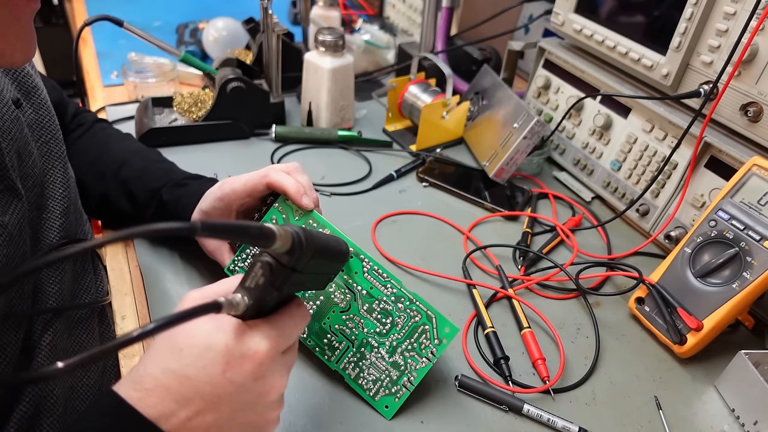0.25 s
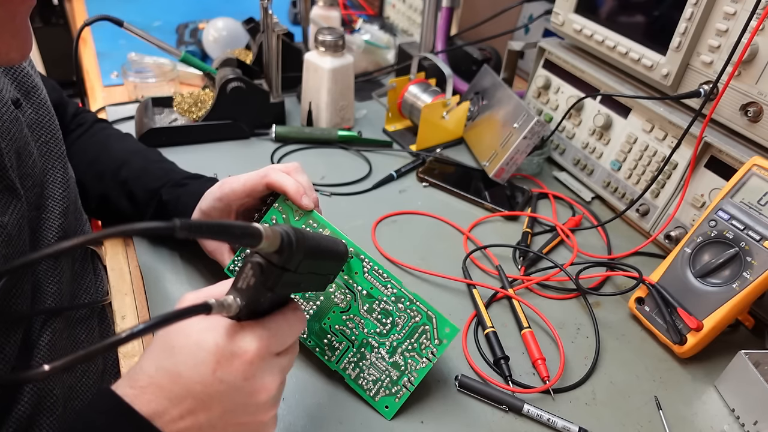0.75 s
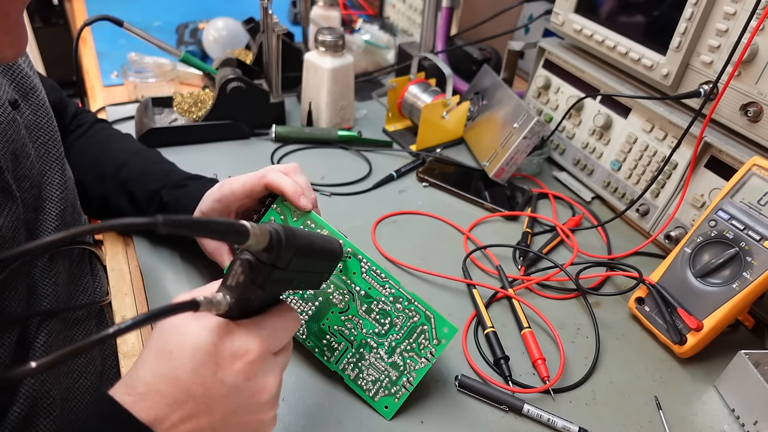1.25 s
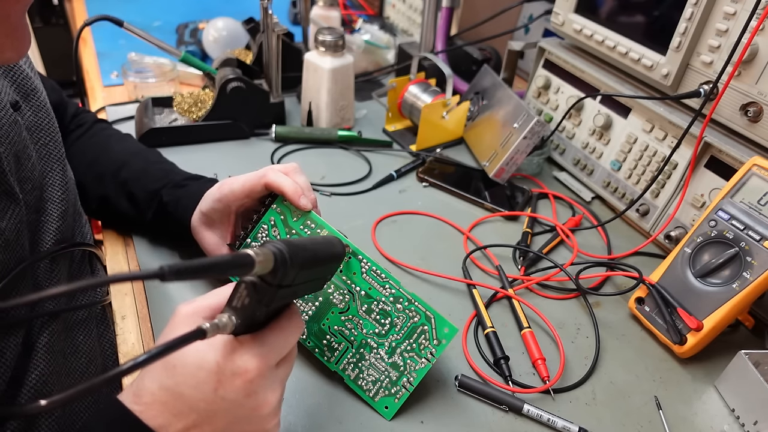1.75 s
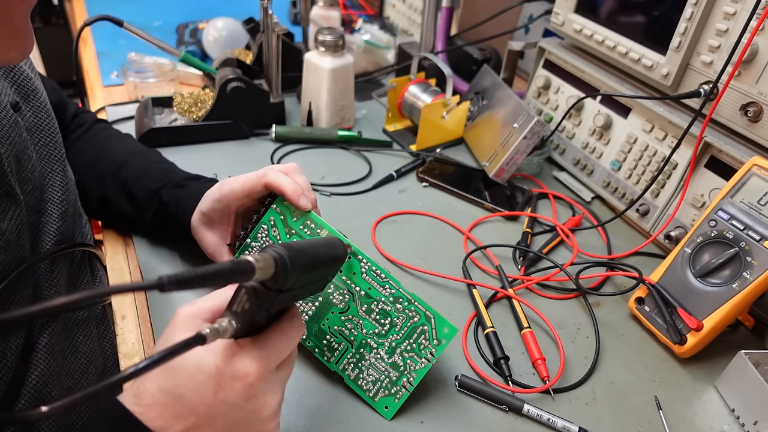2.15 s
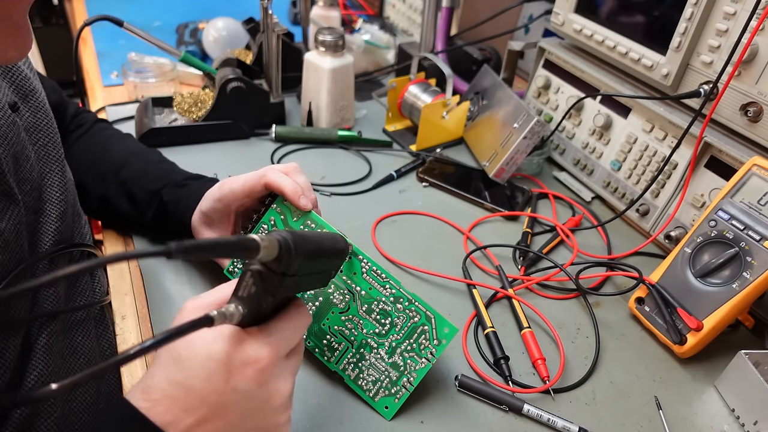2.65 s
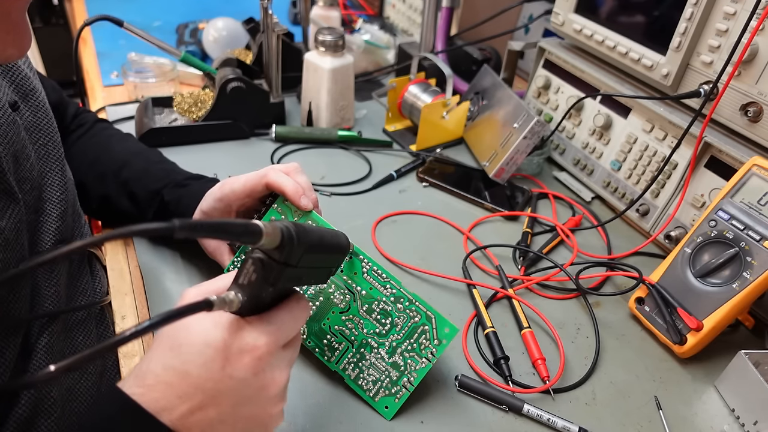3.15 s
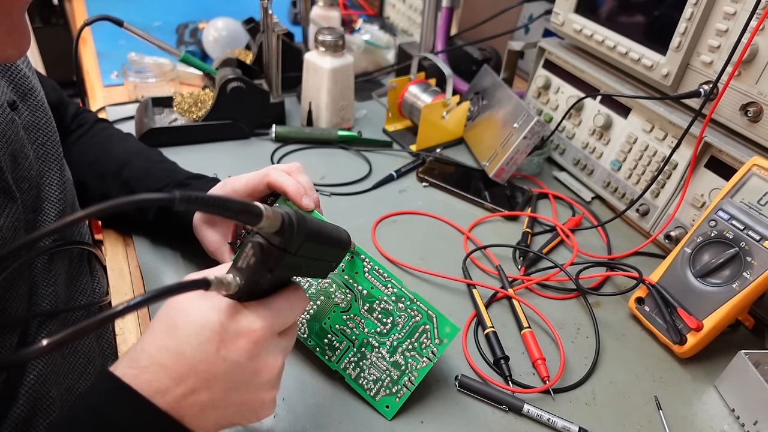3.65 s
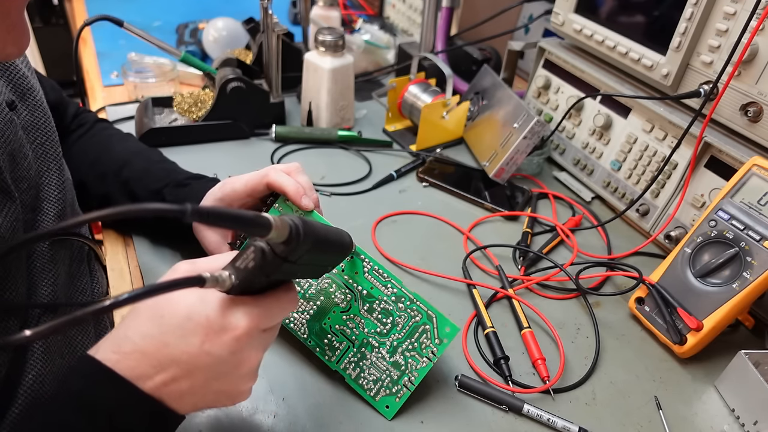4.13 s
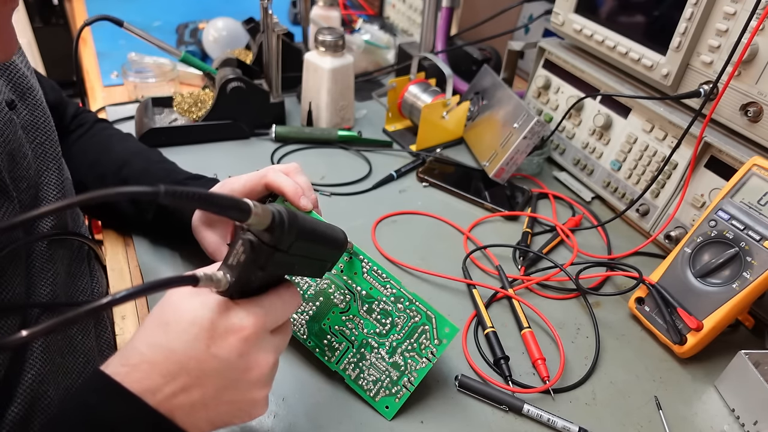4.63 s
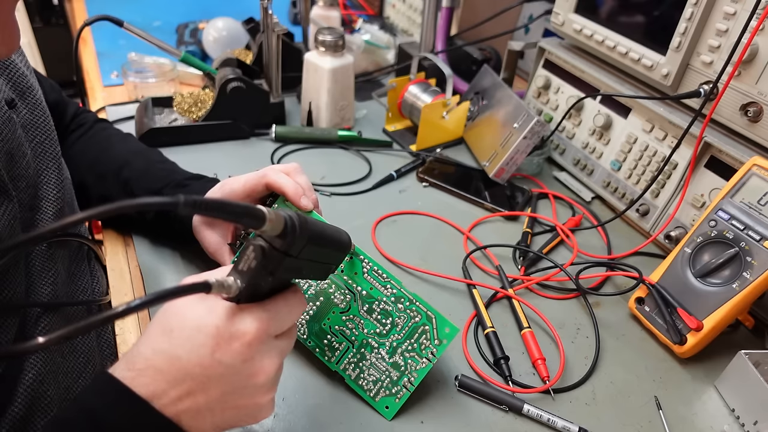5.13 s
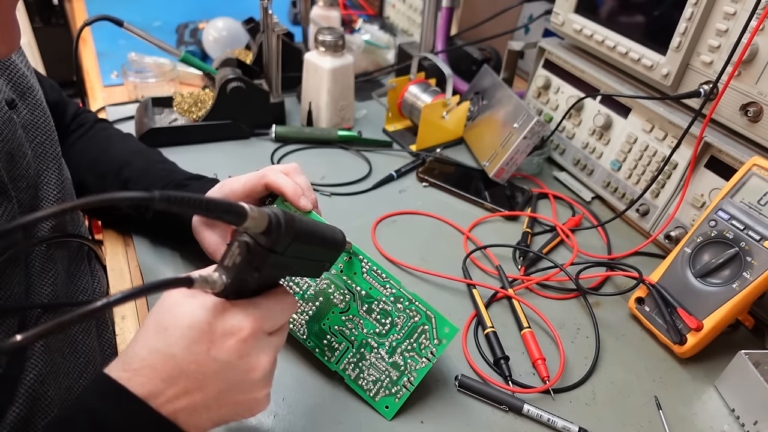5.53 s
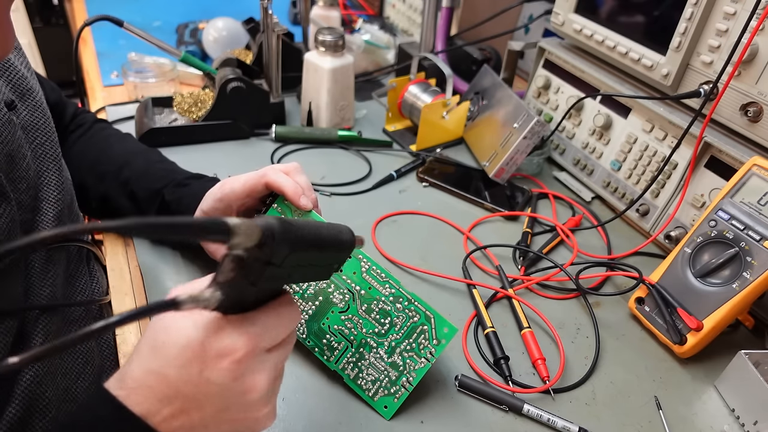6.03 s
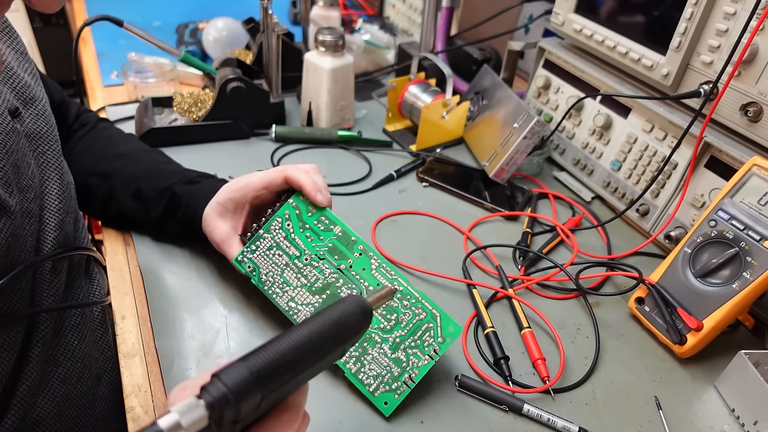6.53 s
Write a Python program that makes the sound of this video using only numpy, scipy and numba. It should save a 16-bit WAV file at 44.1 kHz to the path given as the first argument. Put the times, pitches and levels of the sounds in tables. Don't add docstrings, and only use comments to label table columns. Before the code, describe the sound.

A desoldering gun gives two harsh, pop-edged air blasts, separated by quiet fan noise, small board clicks, knocks and cable rustle.

```python
import sys
import numpy as np
from scipy import signal
from scipy.fft import rfft, irfft
from scipy.io import wavfile
from scipy.ndimage import uniform_filter1d
from numba import njit

SR = 44100
rng = np.random.default_rng(int(sys.argv[2]) if len(sys.argv) > 2 else 0)


def transcribe(u):
    v = np.clip(np.atleast_2d(u).T, -1, 1)
    q = np.round(v * 32767).astype(np.int16)
    wavfile.write(sys.argv[1], SR, q)


def boost_factor(decibels):
    exponent = np.asarray(decibels, float) / 20
    return 10 ** exponent


N = 299439
T = np.arange(N) / SR

# f/Hz, level per Hz/dB
FAN_AIR = [(12, -40.5), (20, 2), (169, 0.5), (195, -5.5), (230, -2), (332, -3), (361, -1.5), (709, -6.5),
           (1390, -7.5), (1560, -10.5), (1790, -11), (2970, -16), (4050, -19.5), (15200, -25),
           (16500, -41.5)]
# f/Hz, width/Hz, level/dB
FAN_HUMPS = [(315, 45, 5), (835, 110, 5), (1573, 82, 9), (3500, 700, 4), (7260, 960, 4.5)]
# f/Hz, level/dB
FAN_TONES = [(199.2, -63), (301.5, -75), (333.8, -63), (699.8, -64), (845.2, -75.5), (1588, -71),
             (2094, -70.5), (2293, -75), (2595, -77), (2891, -66), (3004, -75.5), (3289, -93.5),
             (7246, -89)]
# f/Hz, time to fall by 60 dB/s
ROOM_ECHO = [(100, 0.32), (1000, 0.28), (4000, 0.35), (8000, 0.36), (16000, 0.26)]

# t/s, level/dB
RUSTLE = [
    [(0.0, -42.5), (0.282, -57.5), (0.8, -49.5)],
    [(1.7, -49.5), (1.904, -66), (2.55, -60)],
    [(4.75, -62), (5.034, -50), (5.188, -53), (5.36, -69)],
    [(6.35, -53), (6.49, -47), (6.706, -40.5), (6.79, -27)],
]
# t/s, level/dB, f/Hz, length/s
SCUFFS = [(0.411, -54.5, 7000, .015), (0.526, -28, 2220, .0039), (0.55, -39, 1800, .021),
          (0.65, -52, 7000, 0.014), (4.3, -58, 2500, .023), (4.84, -36, 2500, 0.0043),
          (6.748, -41, 350, .007), (0, -37.5, 298, 0.018), (.015, -43, 2500, .014),
          (4.866, -41.5, 5000, .021), (2.265, -44, 2200, 0.011), (4.984, -46, 870, 0.031),
          (5.065, -56, 8000, .015), (5.126, -51, 7960, .011), (5.152, -45, 2500, .012),
          (6.785, -43, 8000, .013)]
# t/s, level/dB, f/Hz, length/s
SQUEAKS = [
    (.41, -46, 2190, .012),
    (1.895, -39.5, 2000, 0.015),
    (2.77, -58.5, 3300, 0.029),
    (3.63, -60, 3600, 0.039),
    (4.09, -58, 2200, .035),
    (4.63, -59, 3500, .03),
    (4.852, -39.5, 12000, .012),
    (2.4, -44, 2100, .006),
    (6.768, -40, 2100, .017),
]

# f/Hz, level/dB, ring time/s (unused: each touch sets its own ring time)
BOARD_MODES = [(433, -4.5, 0.22), (757, 8, 0.18), (1190, 7, 0.058), (1494, 4, 0.078), (1715, 11.5, 0.075),
               (1955, -31, 0.048), (2050, 25, 0.058), (2490, -0.5, 0.088), (2686, -19.5, 0.051),
               (3195, -19.5, 0.042), (3340, 17, 0.12), (5250, -23.5, 0.087)]
# t/s, peak level/dB, f/Hz
TICKS = [(0.387, -19.5, 2100), (0.5248, -15.5, 2270), (0.5432, -16.5, 2140), (0.5737, -30, 2950),
         (0.6167, -18.5, 2240), (1.7714, -27.5, 1920), (1.9095, -29, 1770), (2.3853, -20.5, 1916),
         (2.427, -32, 1800), (6.3689, -41, 1430), (6.4713, -36.5, 904), (6.544, -32.5, 2890),
         (6.7045, -20, 3500), (6.7055, -23, 2680), (1.889, -35, 2100)]
# t/s, peak level/dB, f/Hz
TAPS = [
    (0.0054, -25.5, 3170),
    (0.26, -24.5, 2180),
    (0.642, -20.5, 3230),
    (1.8691, -33.5, 1180),
    (2.2467, -15.5, 1900),
    (2.3188, -30.5, 1830),
    (4.8444, -9.5, 3280),
    (5.1307, -28.5, 1560),
    (5.1402, -27.5, 2750),
    (6.738, -18, 2600),
]
# t/s, peak level/dB, f/Hz
TRIGGER = [
    (.8338, -27, 3000),
    (5.3835, -29, 2200),
]
# t/s, peak level/dB, f/Hz
PINGS = [
    (5.052, -40, 2200),
    (5.145, -35, 8850),
    (6.743, -34, 2050),
    (4.847, -36, 8300),
    (2.247, -30, 3100),
    (6.708, -32, 3750),
]
# t/s, peak level/dB, f/Hz
KNOCKS = [(0.005, -31, 1290), (0.017, -36.5, 454), (0.281, -33.5, 876), (0.525, -19.5, 1030),
          (0.541, -19, 880), (0.617, -29.5, 450), (1.925, -40, 730), (2.245, -29.5, 408), (2.426, -39, 387),
          (4.835, -31, 440), (4.845, -19, 1190), (6.473, -30, 1103), (6.738, -16.5, 1204),
          (6.739, -27, 404)]
# t/s, peak level/dB, f/Hz
THUDS = [(0.266, -42, 170), (0.289, -39, 79), (0.387, -39, 83.4), (0.408, -40, 89), (0.529, -31, 87),
         (0.549, -38, 119), (0.619, -39, 100), (1.756, -47, 72.7), (1.919, -41, 113), (2.245, -42, 159),
         (2.317, -40, 114), (2.383, -37, 92), (2.429, -41, 102), (3.081, -46, 83.4), (4.835, -30.5, 108),
         (4.959, -38.5, 200), (5.058, -40.5, 70.0), (5.126, -37, 89), (6.494, -44, 98), (6.741, -38, 98)]
# t/s, peak level/dB, f/Hz
CRACKS = [(0.0054, -47, 5560), (0.2503, -47, 6390), (0.5242, -45, 5260), (0.5414, -35.5, 7080),
          (0.6405, -41, 5290), (2.247, -34.5, 9150), (4.8446, -22.5, 8650), (4.8442, -14.5, 6200),
          (0.5255, -33, 10500), (6.5934, -46, 6700), (6.602, -28.5, 8500), (6.6114, -38, 7830),
          (6.7047, -30.5, 8000)]

# valve opens t/s, valve shuts t/s, hiss level/dB, opening pop level/dB, closing pop level/dB
PULLS = [
    (0.8387, 1.4397, -8, -1.5, 1.5),
    (5.3916, 6.1376, -8, -2.5, 0.5),
]
POP_HZ = [
    555,
    440,
]
# t from the pop/s, level/dB
OPENING_FLOW = [(-.006, -60), (-.0035, -40), (-.0025, -17), (0, -12), (.003, -4), (.010, 0)]
# t from the pop/s, level/dB
CLOSING_FLOW = [(-.015, 0), (-.005, -2), (.006, -11.5), (.018, -5.5), (.04, -10), (.07, -18.5), (.1, -29),
                (.13, -71), (.19, -63)]
# f/Hz, level per Hz/dB
JET_HISS = [(88, -80.5), (150, -44.5), (409, -18), (508, -10.5), (1050, -6), (1330, -9), (1560, -3),
            (2700, -4.5), (3420, -1.5), (4250, -6), (6050, -8), (8620, -6), (9700, -7.5), (15600, -17.5),
            (16500, -66.5)]
# f/Hz, width/Hz, level over the jet/dB
CAVITIES = [(516, 63, 0.5), (1053, 130, -3), (1560, 150, -2.5), (2650, 75, 3.5), (2973, 91, 2.5),
            (3176, 51, 5), (3467, 200, 6), (3600, 110, 2.5), (3800, 140, 7), (2030, 37, 2), (2218, 56, 0),
            (4894, 30, 4.5), (5010, 23, 3), (7250, 60, 3), (9810, 76, 1), (6100, 72, 1.5), (5830, 220, 4.5),
            (6170, 310, 6.5), (6680, 230, 4.5), (7040, 210, 4.5), (7470, 220, 2.5), (8140, 240, -4.5),
            (9340, 280, -1.5), (9730, 250, 7.5), (10180, 300, -1.5), (11560, 750, 4.5), (12850, 500, 2.5),
            (14000, 500, 3), (15400, 500, 4)]
# f/Hz, width/Hz, level/dB
GAPS = [(1350, 71, -1.5), (8050, 160, -5), (8530, 110, -11.5), (8800, 180, -6.5), (10400, 400, -1),
        (11350, 160, -4.5), (13550, 250, -4.5)]
# t/s, length/s, f/Hz, level/dB
WHISTLES = [
    (1.40, 0.031, 4900, -21),
    (1.37, 0.026, 8800, -19),
    (1.01, 0.072, 6200, -31),
    (1.4, .02, 11600, -27.5),
    (6.08, .04, 9750, -20),
    (5.394, 0.003, 8400, -16.5),
    (5.397, .002, 2500, -18),
    (.845, 0.0055, 8300, -13),
]


def level(x, db):
    return x * boost_factor(db) / np.sqrt(np.mean(x ** 2))


def noise(length=N):
    return rng.standard_normal(length)


def colour(x, table, humps=()):
    hz = np.fft.rfftfreq(len(x), 1 / SR) + 1
    points = np.transpose(table)
    gain = boost_factor(np.interp(np.log(hz), np.log(points[0]), points[1]))
    for centre, width, db in humps:
        gain = gain * (1 + (boost_factor(db) - 1) / (1 + (2 * (hz - centre) / width) ** 2))
    return irfft(rfft(x) * gain, len(x))


def band(x, lo_hz, hi_hz):
    return signal.sosfilt(signal.butter(2, [lo_hz, hi_hz], "bandpass", fs=SR, output="sos"), x)


def walk(rate):
    hold = int(SR / rate)
    steps = np.repeat(noise(N // hold + 1), hold)
    return 1.3 * uniform_filter1d(uniform_filter1d(steps, hold), hold)[:N]


def swell(s, length):
    return np.exp(-((T - s) / length) ** 2)


def add(out, s, sound):
    i = int(s * SR)
    out[i:i + len(sound)] += sound[:N - i]


@njit
def follow(x, attack, release):
    y, e = np.empty(len(x)), 1e-3
    for i in range(len(x)):
        e += (x[i] - e) * (attack if x[i] > e else release)
        y[i] = e
    return y


def room(x, wet_db, gap=0.0011):
    t, tail = T[:SR // 2], 0
    points = np.transpose(ROOM_ECHO)
    for hz in 100 * 2. ** np.arange(8):
        t60 = np.interp(np.log(hz), np.log(points[0]), points[1])
        tail = tail + band(noise(len(t)), hz / 2 ** .5, hz * 2 ** .5) * boost_factor(-60 * t / t60)
    tail *= np.clip(t / gap - 1, 0, 1)
    echo = signal.fftconvolve(x, tail / np.sqrt(np.sum(tail ** 2)))[:N]
    return x + boost_factor(wet_db) * echo


def fans():
    sound = level(colour(noise(), FAN_AIR, FAN_HUMPS), -50) * boost_factor(.5 * walk(3))
    for hz, db in FAN_TONES:
        loudness = np.sqrt(2) * boost_factor(db + 1.6 * walk(6.2))
        sound += loudness * np.sin(2 * np.pi * hz * T + .9 * walk(4.1))
    return sound


def brushing():
    brush = level(band(band(noise(), 450, 4000), 200, 4000), 0) * boost_factor(1.8 * walk(25))
    out = np.zeros(N)
    for rows in RUSTLE:
        s, brush_db = np.transpose(rows)
        edge = np.clip(np.minimum(T - s[0] + 0.027, s[-1] + 0.029 - T) / 0.023, 0, 1)
        out += edge * brush * boost_factor(np.interp(T, s, brush_db) - 6.5)
    return out


def scuffing():
    grit = noise() * boost_factor(3.0 * walk(300))
    out = np.zeros(N)
    for rubs, octaves in ((SCUFFS, 1.35), (SQUEAKS, 0.43)):
        half = 2 ** (octaves / 2)
        for s, db, hz, length in rubs:
            out += level(band(grit, hz / half, hz * half), db) * swell(s, length)
    return out


def contacts(table, ring, octaves, rise, board_db, tail_db, snap_db):
    out, t = np.zeros(N), T[:SR // 4]
    mode_hz, mode_db, mode_t60 = np.transpose(BOARD_MODES)[:, :, None]
    chance = rng.standard_normal((len(table), 2, len(BOARD_MODES), 1))
    spread = 2 ** (np.clip(octaves, .1, 3) / 2)
    for (s, db, hz), (size, phase) in zip(table, chance):
        hiss = noise(len(t))
        t60 = ring * (1000 / hz) ** 0.44
        distance = np.log(mode_hz / hz) / np.log(spread)
        share = boost_factor(board_db + 0.18 * mode_db + 3.3 * size - 4.8 * distance ** 2)
        board = (share * np.sin(2 * np.pi * mode_hz * t + 3 * phase)).sum(axis=0)
        edges = hz / spread, min(hz * spread, 19000)
        burst = level(band(band(hiss, *edges), *edges), 0)
        struck = (board + burst + np.sin(2 * np.pi * hz * t)) * boost_factor(-60 * t / t60)
        wide = hz / spread / 1.57, min(1.54 * spread * hz, 19000)
        struck += level(band(band(hiss, *wide), *wide), snap_db) * np.exp(-t * hz / 2.27)
        after_ring = burst * boost_factor(tail_db - 17 * t / t60)
        sound = (struck + after_ring) * (1 - np.exp(-t / rise))
        add(out, s, boost_factor(db) * sound / np.abs(sound).max())
    return out


def bench():
    out = contacts(KNOCKS, ring=.045, octaves=1.67, rise=0.0011, board_db=-7, tail_db=-15.5, snap_db=-3.5)
    out += contacts(THUDS, ring=.032, octaves=0.77, rise=0.0029, board_db=-30, tail_db=-19, snap_db=-1.0)
    return out


def tip():
    out = contacts(TICKS, ring=0.039, octaves=0.82, rise=0.00035, board_db=-5.5, tail_db=-23, snap_db=-4)
    out += contacts(TAPS + TRIGGER, ring=.048, octaves=1.8, rise=0.0003,
                    board_db=-3.5, tail_db=-22, snap_db=0.5)
    out += contacts(PINGS, ring=.11, octaves=.25, rise=0.0005, board_db=-30, tail_db=-20, snap_db=-8)
    out += contacts(CRACKS, ring=.1, octaves=.75, rise=0.00013, board_db=-33, tail_db=-27, snap_db=1.0)
    return out


def flow():
    flow_db = np.full(N, -200.)
    for opens, shuts, *_ in PULLS:
        points = [(opens + a, b) for a, b in OPENING_FLOW] + [(shuts + a, b) for a, b in CLOSING_FLOW]
        s, db = np.transpose(points)
        flow_db = np.maximum(flow_db, np.interp(T, s, db, left=-200, right=-200))
    return flow_db


def jet(flow_db):
    air = noise() * boost_factor(.5 * walk(30))
    slowing = np.maximum(np.minimum(flow_db, flow_db.max()) - flow_db.max(), -30)
    settling = sum(-12 * swell(pull[0], 0.005) for pull in PULLS)
    for hz, width, db in CAVITIES:
        sings = db + 2.33 * walk(14) + 1.66 * walk(2.966) + settling
        sings += slowing * (0.16 + 0.39 * (hz / 10000) ** 3)
        air += boost_factor(sings) * band(noise(), hz - width / 2, hz + width / 2)
    air = level(colour(air, JET_HISS, GAPS), 0)
    air += band(air, 8000, 17000) * (boost_factor(0.3 * slowing) - 1)
    first, second = PULLS
    hiss_db = np.interp(T, [first[1] + 1, second[0] - 1], [first[2], second[2]])
    return boost_factor(hiss_db + flow_db) * air


def pop(s, hz, crest, rise, fall, push):
    late = T - s - crest
    slug = -np.exp(-(late / np.where(late < 0, rise, fall)) ** 2) * np.cos(2 * np.pi * hz * (T - s))
    slow = (T - s) / .0018
    return slug + push * slow * np.exp(-slow ** 2)


def valve():
    out = np.zeros(N)
    for (opens, shuts, _, open_db, shut_db), hz in zip(PULLS, POP_HZ):
        out += boost_factor(open_db) * pop(opens, hz, crest=.28 / hz, rise=.0021, fall=.36 / hz, push=.26)
        out += boost_factor(shut_db) * pop(shuts, hz=480, crest=0, rise=.0012, fall=.0012, push=.13)
    return out


def whistles():
    out = np.zeros(N)
    for s, length, hz, db in WHISTLES:
        out += level(band(noise(), .99 * hz, 1.01 * hz), db) * swell(s, length)
    return out


def gun():
    bursts = valve() + whistles()
    fading = signal.lfilter([1], [1, -np.exp(-1 / (0.02 * SR))], np.abs(band(bursts, 200, 900)))
    flutter = band(noise(), 350, 1100) * fading
    return jet(flow()) + bursts + boost_factor(-35.5) * flutter


def scene():
    background = fans() + brushing() + scuffing()
    mono = background + room(bench() + tip(), wet_db=-15.5) + room(gun(), wet_db=-15.0)
    return np.array([mono, mono])


def band_limit(x):
    return signal.sosfilt(signal.butter(12, 16990, fs=SR, output="sos"), x)


def record(dry):
    heard = follow(np.abs(dry[0]), 1 / (0.023 * SR), 1 / (.12 * SR))
    gain = np.minimum(boost_factor(-42) / heard, 1) ** 0.15
    x = np.tanh(.75 * gain * dry) / .75
    hiss = noise()
    lower = level(band(band(hiss, 5500, 6800), 5400, 6400), -32.0) * (np.abs(T - .865) < .022)
    upper = level(band(band(hiss, 8400, 10500), 8400, 10500), -29) * (np.abs(T - .875) < .033)
    rumble = level(band(hiss, 18, 500), -81)
    x = x + (lower + upper + rumble) * np.array([[1], [-1]])
    x = signal.sosfilt(signal.ellip(16, .2, 80, 15760, fs=SR, output="sos"), x)
    return band_limit(x)


dry = scene()
out = record(dry)
transcribe(out)
```